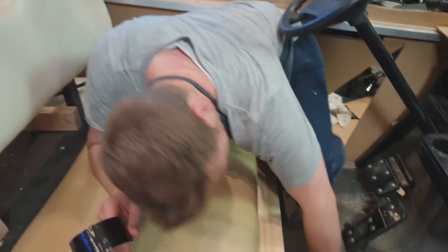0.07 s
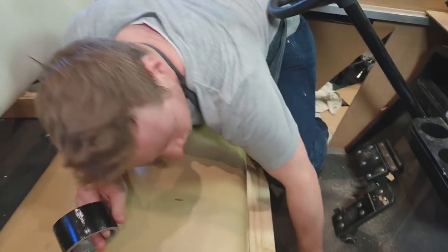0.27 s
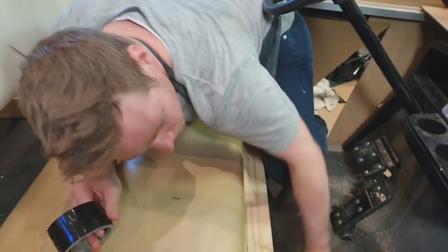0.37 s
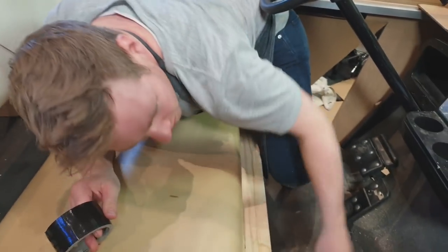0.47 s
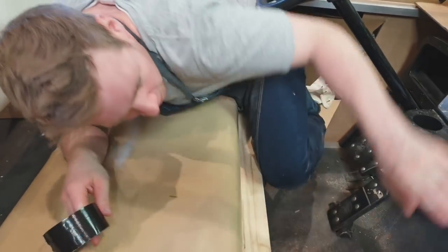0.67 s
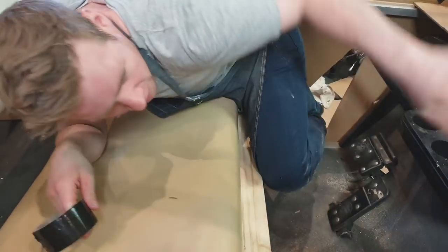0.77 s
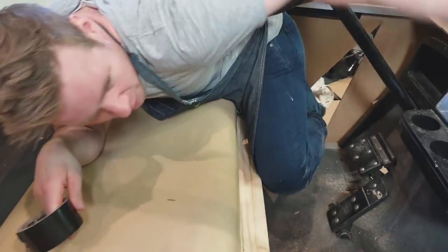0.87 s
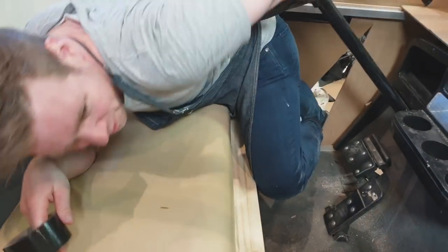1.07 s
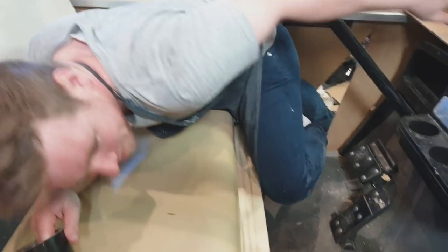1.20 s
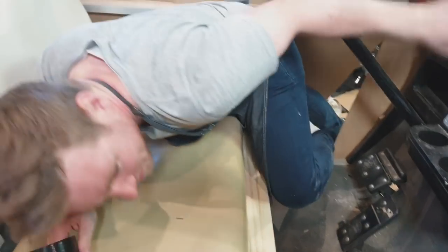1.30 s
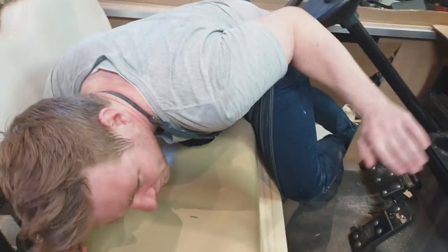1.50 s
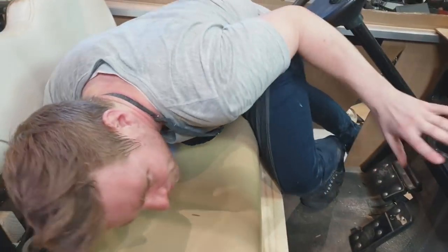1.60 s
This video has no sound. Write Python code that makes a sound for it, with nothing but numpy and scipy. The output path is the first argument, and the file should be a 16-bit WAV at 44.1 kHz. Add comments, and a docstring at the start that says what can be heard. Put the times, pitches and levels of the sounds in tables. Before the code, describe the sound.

Hollow wooden panels knock and thump as a person squeezes over a seat, cardboard scuffing

```python
"""Someone squeezes over a seat in a garage, close to a two-port microphone, above low room noise and hiss.
First, knee and elbow knock hollow wooden panels: noise cracks, ringing modes and soft low blows.
Weight rumbles through the panels as random bumps, while a sleeve scuffs cardboard, mostly on the right, as grit.
Near 0.9 s one panel groans under a dragged load, a harmonic tone, among weaker blows and bright noise puffs.
Then the scuff returns with a moving resonance and drifts left, with a few faint knocks near the end."""
import sys
import numpy as np
from scipy import signal
from scipy.fft import rfft, irfft
from scipy.io import wavfile
from scipy.ndimage import uniform_filter1d

SR = 44100
rng = np.random.default_rng(int(sys.argv[2]) if len(sys.argv) > 2 else 0)


def dump(signal):
    """Clip the signal to [-1, 1] and save it as 16-bit WAV at the path in sys.argv[1]."""
    limited = np.clip(np.atleast_2d(signal).T, -1, 1)
    pcm = np.round(limited * 32767).astype(np.int16)
    wavfile.write(sys.argv[1], SR, pcm)


def invert_db(x):
    """Field ratio 10**(x/20) for x, a level in decibels (scalar or array-like)."""
    u = np.asarray(x, float) / 20
    return 10 ** u


N = 72765

# modes of the wooden panels: pitch_hz, level_db, t60_s
PANEL_MODES = [(150.4, -3, 0.18), (220.8, -2, 0.12), (285.7, -4, 0.098), (386.5, -11, 0.15),
               (568, -9, 0.098), (683, -7.5, 0.039), (806, -11.5, 0.068), (943, -11, 0.053),
               (1254, -16, 0.065), (1772, -21.5, 0.16)]


def evened(x):
    """Scales to rms 1."""
    return x / np.sqrt(np.mean(x ** 2) + 1e-20)


def read(points, hz):
    """Reads a table on a log-frequency axis."""
    f, value = np.transpose(points)
    return np.interp(np.log(hz + 1), np.log(f + 1), value)


def curve(rows, column):
    """One column of a time table, for every sample."""
    return np.interp(np.arange(N) / SR, [r[0] for r in rows], [r[column] for r in rows])


def colour(x, points, tilt_db=0):
    """Filters by a spectrum table, tilted about 1 kHz by tilt_db per octave."""
    hz = np.fft.rfftfreq(x.shape[-1], 1 / SR)
    gain_db = read(points, hz) + tilt_db * np.log2(hz / 1000 + 0.01)
    return irfft(rfft(x) * invert_db(gain_db), x.shape[-1])


def panned(x, pan_db):
    """Places a sound by its left-minus-right level."""
    return x * invert_db(np.array([pan_db / 2, -pan_db / 2])).reshape(2, -1)


def add(mix, start_s, sound):
    """Mixes a sound in at a time, cut at the end of the mix."""
    part = mix[:, round(start_s * SR):][:, :sound.shape[1]]
    part += sound[:, :part.shape[1]]


def sparse(per_s, spread_db, size):
    """Random clicks of random sign, a few of them large."""
    hits = rng.random(size) < per_s / SR
    sign = rng.choice([-1., 1.], size)
    return hits * sign * invert_db(spread_db * np.minimum(rng.exponential(1, size), 4))


def mode(hz, level_db, t60_s, t):
    """One dying partial."""
    return invert_db(level_db - 60 * t / t60_s) * np.sin(2 * np.pi * hz * t)


def burst(points, tilt_db, size):
    """Noise that both ports share with a small random lag, plus a part of their own."""
    shared = rng.standard_normal(size)
    lag_samples = round(12 * rng.uniform(-1.346, 1))
    common = np.array([shared, np.roll(shared, lag_samples)])
    own = 0.98 * rng.standard_normal((2, size))
    return evened(colour(common + own, points, tilt_db))


def resonate(x, hz, width_hz):
    """A resonance that follows the curve hz: shift down to 0 Hz, low-pass, shift back."""
    turn = np.exp(2j * np.pi * np.cumsum(hz) / SR)
    r = np.exp(-np.pi * width_hz / SR)
    return 2 * (turn * signal.lfilter([1 - r], [1, -r], x / turn)).real


def floor():
    """Steady noise, independent per channel: low room hum and microphone hiss."""
    # spectrum: freq_hz, level_db
    floor_spectrum = [(15, -44), (25, -3), (122, -8), (178, -10.5), (260, -9), (305, -13), (378, -20),
                      (410, -15), (1450, -40.5), (4600, -29.5), (15500, -26)]
    return invert_db(-42) * evened(colour(rng.standard_normal((2, N)), floor_spectrum))


def garage(x):
    """Sparse reflections, other ones per channel, each band dying at its own speed."""
    # decay: freq_hz, t60_s
    decay = [(100, 0.67), (500, 0.32), (2000, 0.28), (8000, 0.25)]
    taps = np.zeros((2, SR // 2))
    # one reflection at a random place in every 20 samples
    at = np.arange(100, SR // 2 - 20, 20) + rng.integers(0, 20, (2, (SR // 2 - 101) // 20))
    np.put_along_axis(taps, at, rng.choice([-1., 1.], at.shape), 1)
    hz, t, z = signal.stft(taps, SR, nperseg=512)
    fade = invert_db(-60 * t / read(decay, hz)[:, None])
    tail = signal.istft(z * fade, SR, nperseg=512)[1]
    return signal.fftconvolve(x, tail / np.linalg.norm(tail[0]), axes=1)[:, :N]


def rumble():
    """Shifting weight bumps the panel modes at random; the frame adds deeper noise."""
    # panel rumble: time_s, level_db
    weight = [(0.0, -20.5), (0.018, -33.5), (0.09, -29), (0.146, -20.5), (0.266, -29), (0.44, -41.5),
              (0.546, -84), (0.62, -31.5), (0.702, -72), (0.73, -33.5), (0.772, -40), (0.904, -27),
              (1.088, -45.5), (1.492, -51.5), (1.65, -36)]
    # deep rumble of the frame: time_s, level_db
    frame = [(0.0, -38.5), (0.058, -64), (0.104, -32), (0.17, -42), (0.196, -22), (0.26, -27),
             (0.394, -38.5), (0.808, -48.5), (0.864, -40), (0.904, -29), (0.928, -26.5), (1.2, -36),
             (1.488, -56.5), (1.65, -39.5)]
    # spectrum of the deep rumble: freq_hz, level_db
    deep_spectrum = [(20, -41), (54, 3.5), (81, -3.5), (103, -4), (140, -7), (200, -8), (260, -62)]
    bumps_per_s, bump_spread_db = 400, 1.5
    t = np.arange(16384) / SR
    ringing = np.zeros((2, N))
    for hz, level_db, t60_s in PANEL_MODES:
        bumps = sparse(bumps_per_s, bump_spread_db, (2, N))
        ringing += signal.oaconvolve(bumps, mode(hz, level_db, t60_s, t)[None])[:, :N]
    deep = colour(rng.standard_normal((2, N)), deep_spectrum)
    return invert_db(curve(weight, column=1)) * evened(ringing) + invert_db(curve(frame, column=1)) * evened(deep)


def groan():
    """Stick and slip at an unsteady rate shakes a panel into a low harmonic groan."""
    # slipping: time_s, slips_per_s, level_db
    slips = [(0.81, 151.0, -46), (0.844, 137, -30.5), (0.896, 129, -27), (0.922, 155, -22.5),
             (0.95, 146.0, -29), (1.02, 135, -40)]
    # harmonics: multiple, level_db
    orders = [(1, 0.5), (2, -5.5), (3, -26), (4, -26.5), (6, -32), (7, -31)]
    t = np.arange(N) / SR
    jitter = 0.66 * uniform_filter1d(rng.standard_normal(N), 300)  # about 4 % rms after smoothing
    turns = np.cumsum(curve(slips, column=1) * (1 + jitter)) / SR
    wobble = 8 * uniform_filter1d(rng.standard_normal((len(orders), N)), 600, axis=1)
    tone = np.zeros(N)
    for (multiple, level_db), w in zip(orders, wobble):
        tone += invert_db(level_db) * (1 + w) * np.cos(2 * np.pi * multiple * turns)
    fade_s = 0.019
    gate = np.clip(np.minimum(t - slips[0][0], slips[-1][0] - t) / fade_s, 0, 1)
    return np.sqrt(2) * invert_db(curve(slips, column=2)) * gate * tone * np.ones((2, 1))


def scuff():
    """Cloth drags over cardboard: dense grit in patches, with a moving resonance of the board."""
    # course of the drag: time_s, level_db, treble_db, pan_left_minus_right_db
    drag = [(0.0, -45, -0.5, -8), (0.105, -44.5, -1, -8.5), (0.116, -35.5, -52, -18), (0.132, -33, -4, -7),
            (0.164, -32, -24, -9), (0.306, -49.5, -10, -11.5), (0.585, -66, 4, -25),
            (0.836, -53.5, -2.5, -24.5), (0.896, -46.5, -16, -9), (1.02, -50.5, 0.5, -11.5),
            (1.092, -45.5, -0.5, -8), (1.134, -34, -1.5, -2.5), (1.217, -41.5, 1.5, -4),
            (1.262, -36.5, -1, -4), (1.334, -36.5, 5, -4), (1.39, -36, -2.5, -4), (1.51, -51.5, 4, -7.5),
            (1.552, -46, 6.5, -1), (1.65, -40, 5, -3)]
    # spectrum of the cardboard: freq_hz, level_db
    card_spectrum = [(500, -56), (603, -35), (968, -14), (1390, -12), (2390, -6.5), (3480, -8.5),
                     (5830, -6.5), (15500, -14.5)]
    # resonance moving as the contact slides: time_s, pitch_hz, share_db
    board = [(1.06, 2950, -20), (1.125, 2860, -5), (1.19, 2400, -13), (1.29, 2550, -11), (1.328, 2440, -4),
             (1.39, 2750, -11), (1.52, 2800, -25), (1.57, 5350, -9)]
    grit_per_s, grit_spread_db, patch_db, board_width_hz = 5300, 2.5, 1.5, 380
    grit = evened(sparse(grit_per_s, grit_spread_db, (2, N)))
    grit = grit + burst([(20, 0), (20000, 0)], 0, size=N)
    note = resonate(grit, curve(board, column=1), board_width_hz)
    sound = evened(colour(grit, card_spectrum)) + invert_db(curve(board, column=2)) * evened(note)
    f, t, z = signal.stft(sound, SR, nperseg=512, noverlap=384)
    patches = uniform_filter1d(rng.standard_normal(z.shape[1:]), 8, 0)
    patches = evened(uniform_filter1d(patches, 10, 1))
    treble_db = np.interp(t, [r[0] for r in drag], [r[2] for r in drag])
    treble_share = np.clip(np.log2(f[:, None] / 5000 + 1e-3), 0, 1)  # 0 below 5 kHz, 1 above 10 kHz
    z = z * invert_db(patch_db * patches + treble_share * treble_db)
    sound = signal.istft(z, SR, nperseg=512, noverlap=384)[1][:, :N]
    return panned(invert_db(curve(drag, column=1)) * sound, curve(drag, column=3))


def bright_puffs():
    """Short bright noise puffs without a body; two swell slowly in the high treble."""
    # puffs: start_s, level_db, pan_left_minus_right_db, t60_s, tilt_db_per_octave, rise_s
    puffs = [(0.126, -24.5, 9, 0.093, 9, 0.015), (0.676, -38, -8, 0.075, 3, 0.0036),
             (0.864, -25, 3, 0.13, 10.5, 0.017), (.886, -32.5, -9, 0.066, -1, 0.0022),
             (0.929, -29.5, -3.5, 0.042, 1, 0.002), (1.544, -31.5, -7.5, 0.045, -2.5, 0.001)]
    # spectrum: freq_hz, level_db
    puff_spectrum = [(590, -34), (1000, -11.5), (2740, -3.5), (4390, -1.5), (4810, -2.5), (15500, -13)]
    out, t = np.zeros((2, N)), np.arange(8192) / SR
    for start_s, level_db, pan_db, t60_s, tilt_db, rise_s in puffs:
        shape = np.minimum(t / rise_s, 1) * invert_db(level_db - 60 * t / t60_s)
        puff = shape * burst(puff_spectrum, tilt_db, size=len(t))
        add(out, start_s - 0.001, panned(puff, pan_db))
    return out


def thuds():
    """Soft heavy blows: a low hollow note that swells in one cycle and rings briefly."""
    # blows: start_s, level_db, pitch_hz, t60_s
    blows = [(0.117, -12.5, 145, 0.062), (.143, -5, 166.7, 0.058), (0.17, -9, 152, 0.057),
             (0.196, -14, 213, 0.02), (0.257, -18, 110, 0.13), (0.866, -33, 233, 0.038),
             (0.881, -25.5, 582, 0.056), (0.898, -19, 290.4, 0.09), (1.051, -46, 128, 0.12),
             (1.64, -33, 240, .1)]
    out, t = np.zeros((2, N)), np.arange(8192) / SR
    for start_s, level_db, hz, t60_s in blows:
        swell = np.minimum(t * hz, 1) ** 2
        loss_db = 60 / hz / t60_s  # decay during the swell, made up for
        add(out, start_s, swell * mode(hz, level_db + loss_db, t60_s, t) * np.ones((2, 1)))
    return out


def knocks():
    """Each knock is a crumbly crack of noise with a snap at its start, plus the panel modes."""
    # sharp blows: start_s, level_db, pan_left_minus_right_db, tilt_db_per_octave, snap_share
    blows = [(0.087, -24, 1, -1.5, 0.15), (0.113, -20.5, -2.5, 0, 0.51), (0.146, -12.5, -6.5, -2, 0.32),
             (0.172, -15, 2.5, -3, 1), (0.196, -23, -4.5, -1, 0.16), (0.214, -27, -2, 2, 0.66),
             (0.254, -23, -6, -9, 0.32), (0.331, -34, -2.5, -3, 0.41), (0.397, -30.5, -0.5, -3.5, 0.72),
             (0.591, -32.5, -1, -3.5, 0.85), (0.618, -35.5, -5.5, -3, 0.64), (0.726, -31.5, -0.5, -2, 0.64),
             (0.798, -30.5, 3.5, -3.5, 0.35), (0.828, -37, 3, -1.5, 0.5), (0.851, -31, 3, -2.5, 0.48),
             (0.872, -29, 1.5, -1.5, 0.3), (1.045, -29, 0.5, -0.5, 0.14), (1.505, -41, 1, -4, 0.1),
             (1.556, -34, 5, -7, 0.25), (1.584, -37, -1, -4, 0.14), (1.617, -41, -3, -7.5, 0.26)]
    # spectrum of the crack: freq_hz, level_db
    crack_spectrum = [(120, -79), (200, -3), (400, -7.5), (900, -11), (2400, -14), (3300, -21),
                      (4660, -26.5), (7620, -28), (15500, -34)]
    crack_db, body_db, crumble_db = -3, -11, 3
    crack_t60_s, snap_decay_s = 0.17, 0.0028
    full_snap_rise_s = 0.0016  # a weak snap swells more slowly
    out, t = np.zeros((2, N)), np.arange(8192) / SR
    for start_s, level_db, pan_db, tilt_db, snap in blows:
        crumbs = invert_db(crumble_db * evened(uniform_filter1d(rng.standard_normal(len(t)), size=90)))
        rise = np.minimum(t * snap / full_snap_rise_s, 1)
        shape = crumbs * invert_db(-60 * t / crack_t60_s) + snap * np.exp(-t / snap_decay_s)
        crack = shape * burst(crack_spectrum, tilt_db, size=len(t))
        body = np.zeros(len(t))
        for hz, mode_db, t60_s in PANEL_MODES:
            detune, strength = rng.standard_normal(2)
            body += mode(hz * (1 + 0.051 * detune), mode_db + 4 * strength, t60_s, t)
        knock = invert_db(level_db) * rise * (invert_db(crack_db) * crack + invert_db(body_db) * body)
        add(out, start_s - 0.001, panned(knock, pan_db))
    return out


def scene():
    """Blows and puffs ring in the garage over rumble, groan, scuff and floor."""
    sharp, dull = knocks() + bright_puffs(), thuds()
    room = garage(invert_db(-3) * sharp + invert_db(-10) * dull)
    return floor() + rumble() + groan() + scuff() + room + dull + sharp


def top_cut(x):
    """Nothing passes above the cut-off."""
    return signal.sosfilt(signal.butter(12, 16750, fs=SR, output="sos"), x)


def record(dry):
    """Two close ports hear the bass nearly alike; the microphone limits the band."""
    # side gain: freq_hz, gain_db
    width = [(60, -20.5), (150, -19), (300, -10), (600, -5), (1200, 0.5), (8000, 0)]
    # microphone response: freq_hz, gain_db
    mic_response = [(20, -46), (33, -25), (48, -2), (6600, -2), (7200, -5.5), (9500, -4), (11000, -1),
                    (15500, -1.5), (15800, -60)]
    mid = (dry[0] + dry[1]) / 2
    side = colour((dry[0] - dry[1]) / 2, width)
    heard = colour(np.array([mid + side, mid - side]), mic_response)
    return top_cut(heard)


dry = scene()
out = record(dry)
dump(out)
```